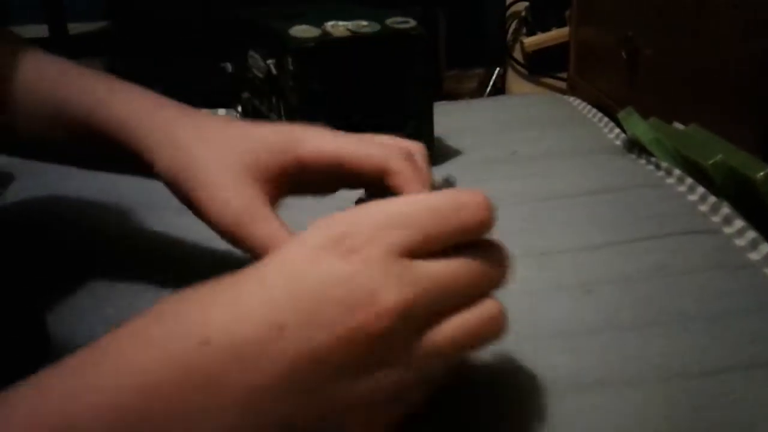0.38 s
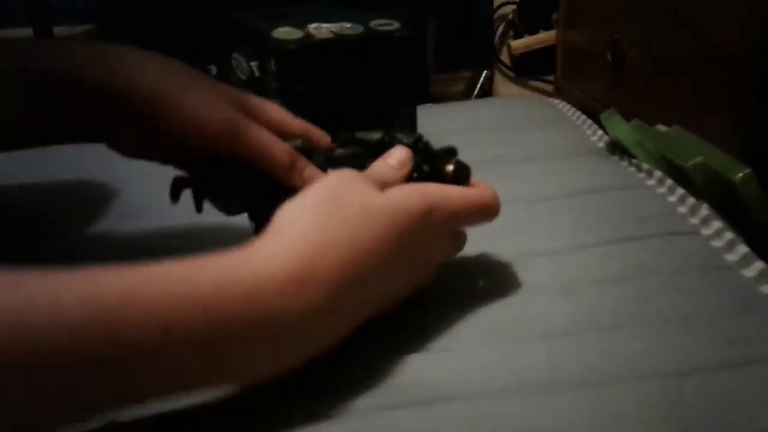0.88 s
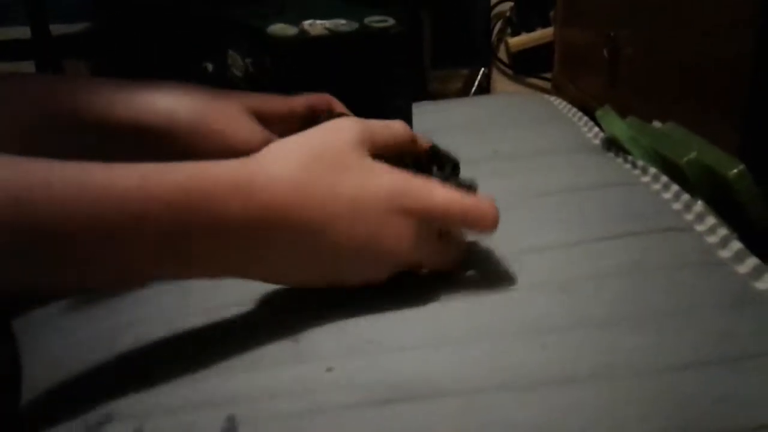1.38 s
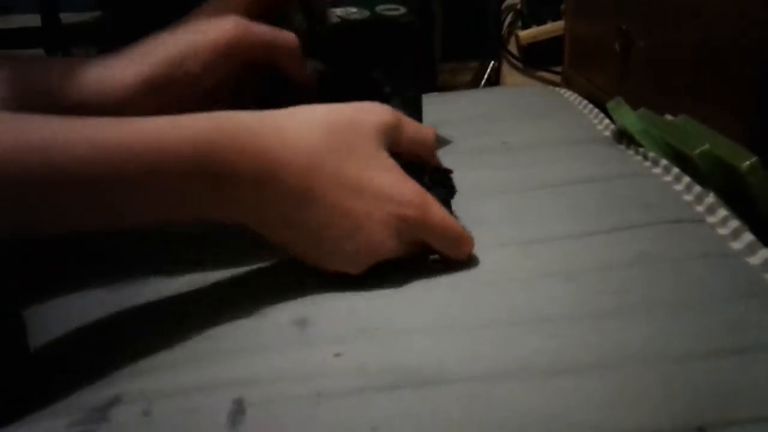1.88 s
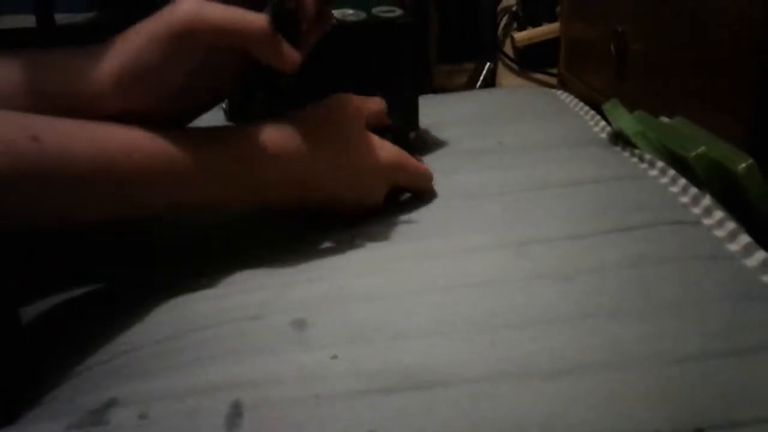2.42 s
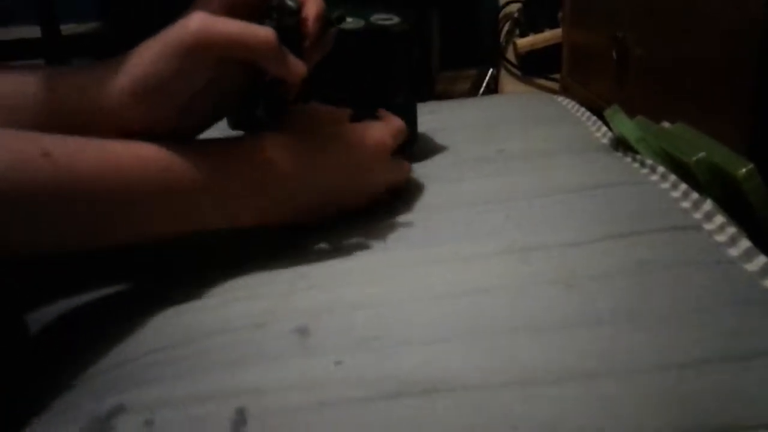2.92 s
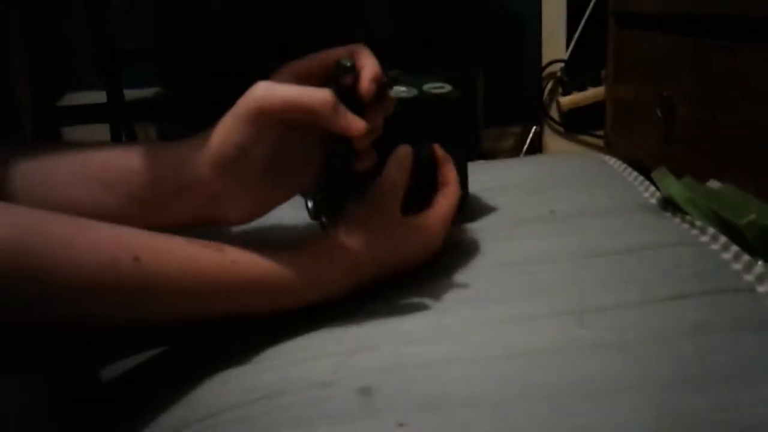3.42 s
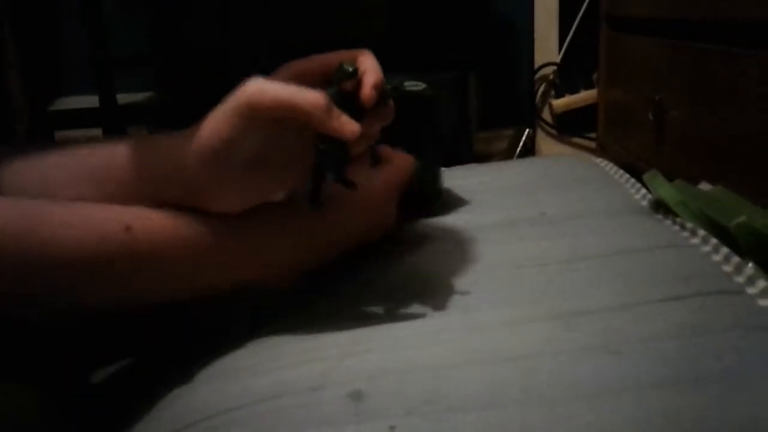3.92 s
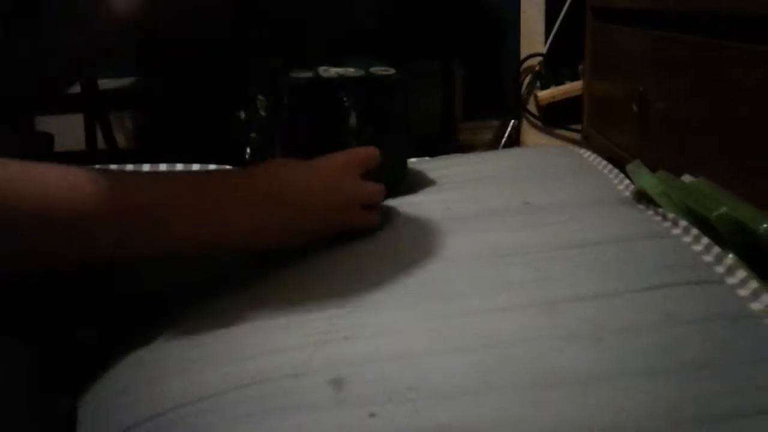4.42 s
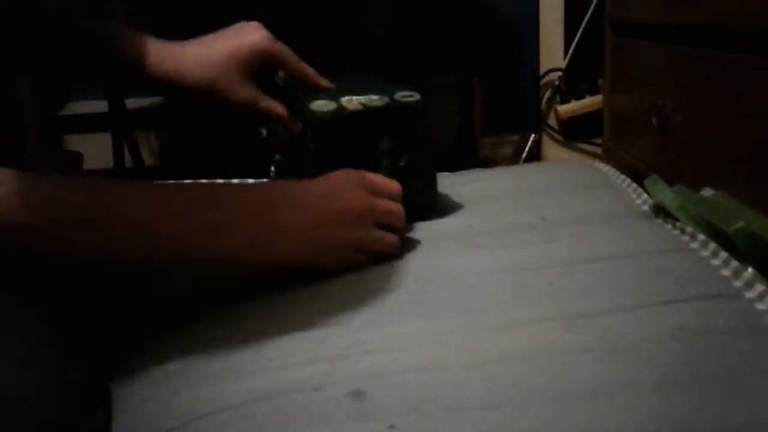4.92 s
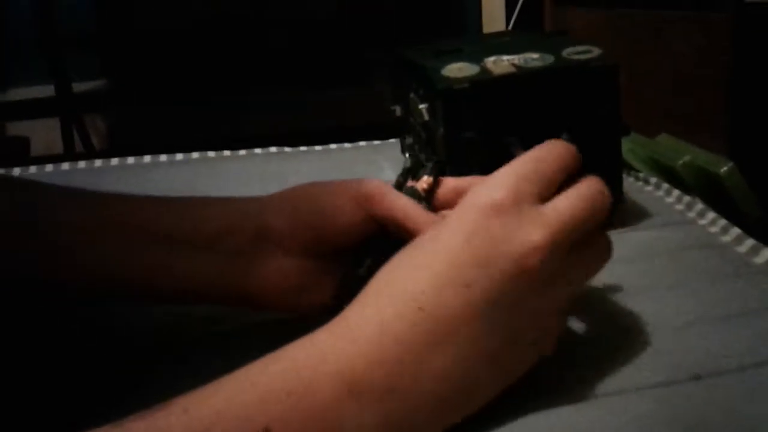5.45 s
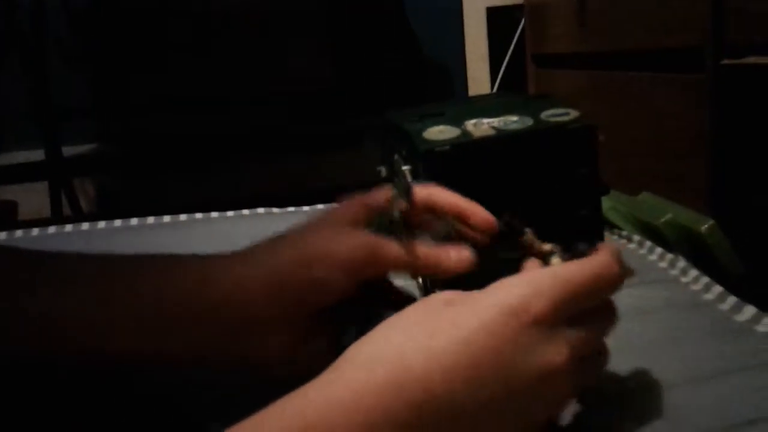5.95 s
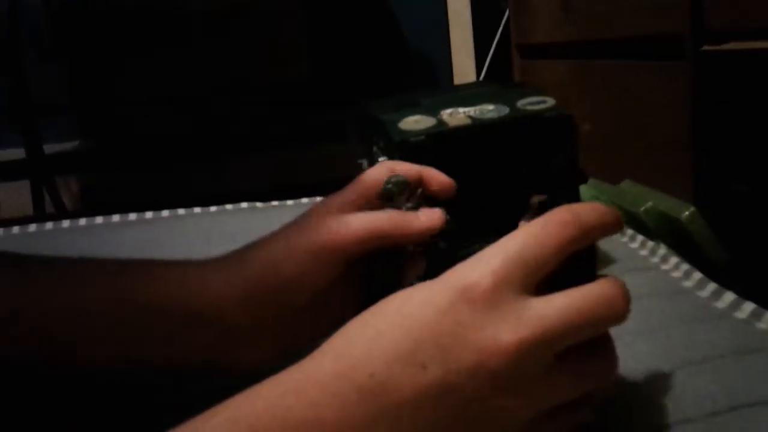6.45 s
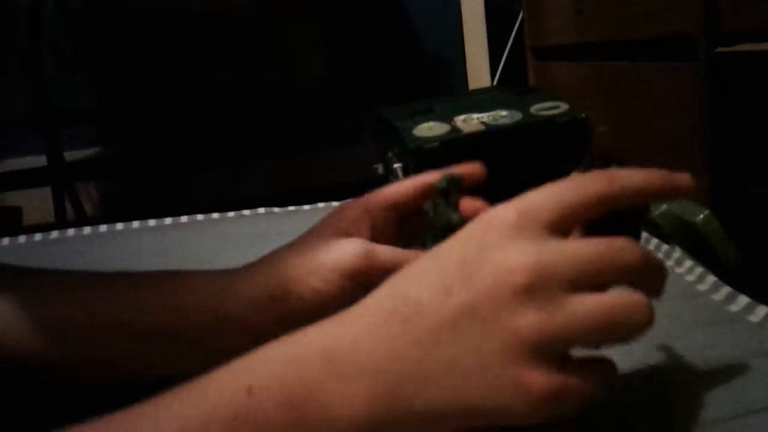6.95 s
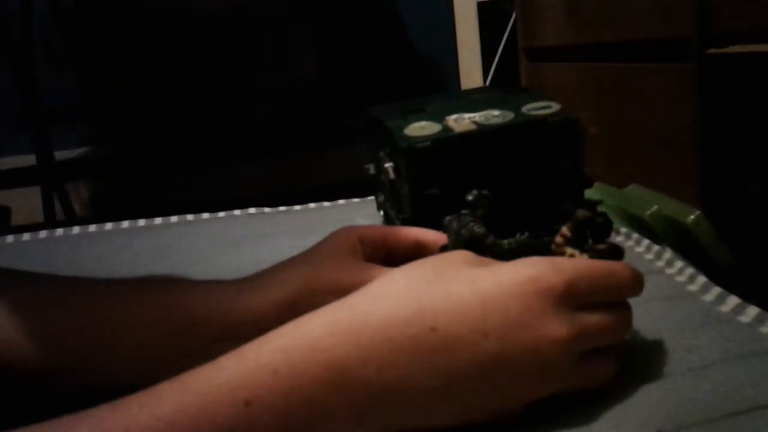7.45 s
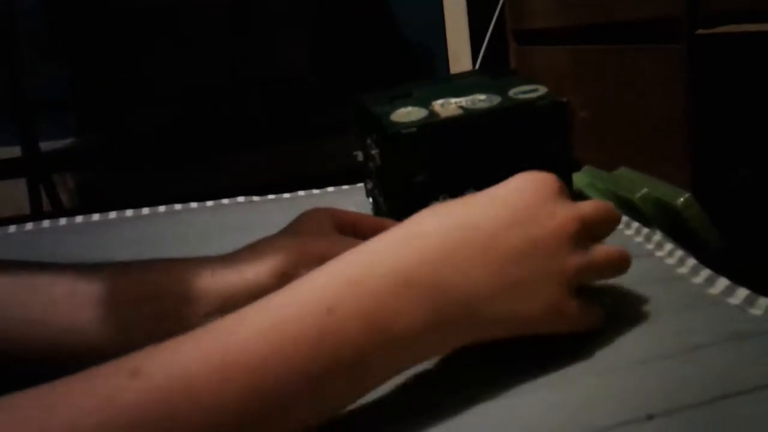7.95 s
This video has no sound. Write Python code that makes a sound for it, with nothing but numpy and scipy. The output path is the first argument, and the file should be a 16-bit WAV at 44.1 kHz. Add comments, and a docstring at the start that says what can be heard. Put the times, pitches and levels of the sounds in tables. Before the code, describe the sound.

Close, bright plastic clicking and cloth rubbing, growing into dense hollow toy knocks, then an abrupt cut to camera bumps and a nearly quiet room.

```python
"""A quiet room, a small mono microphone with a strong treble resonance close to a cloth-covered table.
First hands shuffle small plastic figures: noisy contacts click, skin and cloth rub as shaped noise; then
figures knock on a hollow toy truck, whose shell and body ring in decaying modes. At a cut to a second shot
the camera is nudged (low swings and dry ticks), soft brushes follow and a few last knocks end it. Under
all lies a rumble of filtered noise; a thin sine whines and narrow noise squeaks in the first shot."""
import sys
import numpy as np
from scipy import signal
from scipy.fft import rfft, irfft
from scipy.io import wavfile
from scipy.ndimage import uniform_filter1d

SR = 44100
rng = np.random.default_rng(int(sys.argv[2]) if len(sys.argv) > 2 else 0)


def master_out(mix):
    """Clip the mix to full scale and print it as 16-bit PCM to the path in sys.argv[1]."""
    frames = np.transpose(np.atleast_2d(mix))
    ceiling = np.clip(frames, -1, 1)
    pcm = np.round(ceiling * 32767).astype(np.int16)
    wavfile.write(sys.argv[1], SR, pcm)


def volts_from_decibels(level):
    """Turn decibel levels (scalar or array-like) into linear amplitude factors."""
    exponent = np.asarray(level, float) / 20
    return 10 ** exponent


N = 356757
CUT_S = 5.082  # the second shot starts here

# Low noise of the house in the room. Each row: frequency in Hz, relative level in dB.
RUMBLE_SPECTRUM = [(18, -55.5), (30, -26), (63, -4), (80, 2.5), (102, -2.5), (113, -5.5), (134, -1),
                   (181, -1), (255, -9), (344, -5), (445, -26.5), (1830, -21.5), (5000, -64), (6500, -79),
                   (11000, -120)]
# Low modes of the room. Each row: frequency in Hz, width in Hz, relative level in dB.
ROOM_MODES = [(94, 14, -1.5), (145, 14, -0.5), (191, 18, -4.5), (406, 8.7, -6.5)]
# Loudness of the rumble. Each row: time in seconds, level in dB.
RUMBLE_LEVEL = [(0, -56), (.2, -63.5), (.59, -56.5), (.9, -61), (2.5, -61), (2.75, -53.5), (3.13, -59.5),
                (4.05, -55), (4.89, -55.5), (5.2, -62), (6.3, -61.5), (6.6, -65), (7.44, -62.5),
                (8.09, -57)]
# Dying away of the room. Each row: frequency in Hz, t60 in seconds.
ROOM_DECAY = [(250, .15), (1000, 0.11), (3000, 0.19), (7000, 0.094), (12000, .12)]
# Treble response of the microphone port. Each row: frequency in Hz, relative level in dB.
PORT_RESPONSE = [(300, -52), (3000, -27.5), (4300, -28.5), (5400, -13), (6200, -3), (7000, -4),
                 (7800, -7.5), (9400, -21), (12000, -47.5), (16000, -79)]
# Knocks carried through the camera body. Each row: start in seconds, thud peak in dB, tick level in dB.
CAMERA_NUDGES = [(5.1539, -37, -45), (5.1617, -44, -27), (5.168, -42.5, -40), (5.2812, -39.5, -63.5),
                 (5.2882, -57, -30), (5.2912, -46.5, -41), (5.2987, -38, -45.5), (5.3095, -40, -39),
                 (5.315, -27, -45), (5.3215, -43, -46.5), (5.328, -29.5, -37), (5.342, -41, -53),
                 (5.3728, -53, -44), (5.4032, -48, -39), (5.5873, -57, -50), (5.6178, -60, -47),
                 (5.6647, -50, -42.5), (5.6797, -38.5, -56), (5.7085, -38, -35.5), (5.7205, -39.5, -50),
                 (5.7253, -29.5, -67.5), (5.7305, -20.5, -20.5)]
# Faint squeaks of plastic under a finger. Each row: start in seconds, length in seconds, level in dB,
# frequency in Hz.
FINGER_SQUEAKS = [(-.03, .08, -58, 1740), (1.098, 0.15, -66.5, 1680), (1.5, 0.058, -68.5, 1700),
                  (1.864, .08, -68, 1950), (3.1, .1, -70, 1770)]
# Short soft brushes, a hand on cloth perhaps. Each row: time of the peak in seconds, hiss peak in dB,
# fade in dB per second.
SOFT_BRUSHES = [(5.75, -71, 68), (6.2, -65.5, 149.5), (7.03, -72, 68), (7.63, -75.5, 100)]
# Rubbing of skin, cloth and plastic, one table per shot. Each row: time in seconds, hiss level in dB,
# level of the lower rustle in dB, share of grit from 0 to 1.
RUBBING = [
    [(0, -53.5, -58, .5), (.07, -70, -71.5, 0.7), (.16, -58, -64.5, 0.4), (.25, -71.5, -76.5, 0.8),
     (.4, -71, -74, 0.5), (.6, -51.5, -63.5, .4), (.76, -59, -70, 0.56), (.86, -75, -75, 0.3),
     (.95, -61, -70.5, 0.5), (1.17, -66, -67.5, 0.55), (1.25, -75, -76, .3), (1.5, -72, -71.5, 0.74),
     (1.82, -78.5, -78, .3), (1.95, -64, -66.5, .6), (2.05, -73, -78, 0.5), (2.2, -62.5, -67, .3),
     (2.47, -84, -81, .2), (2.72, -42.5, -48.5, .5), (2.8, -58, -59, 0.44), (2.89, -51, -55.5, 0.4),
     (3.03, -71, -71.5, 0.9), (3.11, -63, -66.5, 0.25), (3.19, -68, -71, 0), (3.43, -52, -63, 0.04),
     (3.55, -59.5, -63, 0.06), (3.85, -57.5, -68, .05), (4.05, -46.5, -49.5, 0.6), (4.13, -53.5, -50, 0.3),
     (4.24, -45, -45.5, 0.24), (4.44, -46.5, -54.5, 0.43), (4.67, -53, -65, 0.25), (4.83, -55, -63, 0.26),
     (4.98, -44.5, -48.5, .4), (5.06, -49.5, -60, 0.3)],
    [(5.09, -102, -77.5, 0.24), (5.27, -97, -73, 0.45), (5.3, -90, -52, .8), (5.34, -92, -55, 0.7),
     (5.38, -106, -75.5, 0.3), (5.71, -98, -68, 0), (5.75, -85.5, -73.5, 0.18), (6.6, -85, -78, 0.4),
     (7.1, -83, -73.5, .2), (7.55, -91.5, -81.5, 0.22), (7.84, -86, -75.5, 0.18), (7.92, -79, -67.5, 0.3),
     (8.04, -78.5, -72, 0.14), (8.08, -86, -49, 0.4)],
]
# Wandering band of the smooth friction, one table per shot. Each row: time in seconds, centre in Hz,
# strength of the band as a factor.
FRICTION_BAND = [
    [(3.0, 6600, 2), (3.35, 6800, 3), (3.45, 7200, 7), (3.85, 7200, 7), (4.1, 7100, 4), (4.45, 7300, 4),
     (4.8, 6900, 3), (5.05, 6700, 2)],
    [(5.72, 7000, 2), (5.8, 7200, 2), (6.2, 6500, 2), (7.1, 6600, 2), (7.7, 6800, 2)],
]
# Thin shell of the toys. Each row: frequency in Hz, relative level in dB, t60 in seconds.
SHELL_MODES = [(1173, -3.5, 0.021), (1330, -4, 0.027), (1522, -3.5, 0.02), (1770, -4, 0.02),
               (2050, 0, 0.017), (2214, -5.5, 0.029), (2390, -7.5, 0.027), (2696, -5.5, 0.018),
               (2975, -8, .015), (3420, -11, .012), (3940, -16.5, 0.006), (4260, -15, 0.0071)]
# Hollow body of the toys. Each row: frequency in Hz, relative level in dB, t60 in seconds.
HOLLOW_MODES = [(220.6, -7, 0.051), (278, 2, 0.026), (342, 1, .045), (423.2, 1, 0.032), (560, -13, 0.09),
                (646, -3, .035), (769, -3, 0.041), (886, -6, .03)]
# Part of the toys being struck, by the note it brings out. Each row: from when in seconds, note in Hz.
STRUCK_PARTS = [(0, 1550), (.44, 2350), (.69, 1620), (1.85, 2000), (1.98, 1710), (2.19, 2050), (2.3, 1515),
                (2.63, 2260), (2.7, 1900), (2.77, 1410), (2.9, 2050), (3.0, 1770), (3.24, 2050),
                (3.5, 1370), (4.0, 2050), (4.19, 1610), (4.34, 1850), (4.84, 2010), (7.8, 2050),
                (7.98, 2300)]
# Figure against figure, light and bright. Each row: start in seconds, click peak in dB,
# chatter t60 in seconds.
FIGURE_TICKS = [(.0795, -46, .009), (.0885, -33, 0.0084), (.1205, -39, 0.05), (.1467, -36.5, 0.014),
                (.1617, -37, 0.0093), (.1905, -50, .009), (.3974, -53, 0.0056), (.406, -34, 0.011),
                (.4652, -16, .0037), (.4767, -17, 0.011), (.482, -20, 0.0048), (.5038, -29, 0.007),
                (.5451, -29, .006), (.5544, -19, 0.0051), (.5599, -17.5, 0.0092), (.5651, -16, .0074),
                (.5826, -10.5, 0.013), (.5939, -16.5, 0.0053), (.598, -26, 0.015), (.6598, -10.5, 0.006),
                (.6625, -16.5, 0.011), (.6956, -49, .006), (.7227, -44, .006), (.7767, -38.5, 0.031),
                (.7851, -43, .0065), (.8687, -46, 0.017), (.8784, -37.5, 0.0084), (.9373, -33, 0.023),
                (.9612, -34, 0.006), (.9962, -26.5, 0.019), (1.0281, -41, 0.0088), (1.0718, -56, .045),
                (1.1092, -34, 0.0063), (1.1165, -37, 0.0068), (1.1264, -40, .012), (1.1462, -30.5, 0.009),
                (1.1728, -35.5, .0067), (1.293, -49, 0.016), (1.3155, -44, 0.011), (1.3288, -47, 0.0049),
                (1.4187, -43.5, 0.16), (1.5093, -46, .026), (1.5297, -45, 0.023), (1.6393, -54, 0.0076),
                (1.7156, -47.5, 0.017), (1.7344, -40, 0.022), (1.7434, -39, 0.016), (1.7573, -30.5, 0.015),
                (1.8735, -43, .006), (1.8861, -33.5, 0.022), (1.9034, -33, 0.0083), (1.9062, -25.5, 0.015),
                (1.9117, -32, 0.0094), (1.9249, -36, .015), (1.94, -43, 0.031), (1.9914, -39.5, 0.038),
                (2.1248, -48, 0.049), (2.1375, -41, 0.023), (2.1477, -38, 0.0055), (2.1579, -34, 0.021),
                (2.1654, -35, .04), (3.1422, -43, .0055), (3.1533, -42, 0.01), (4.3737, -34, 0.015),
                (5.0783, -32.5, .0078), (7.7902, -41.5, .0073)]
# Figure against the truck. Each row: start in seconds, click peak in dB, chatter t60 in seconds,
# shell level in dB, hollow peak in dB.
TRUCK_KNOCKS = [(2.2013, -18.5, .018, -33, -40), (2.2307, -35.5, .03, -40.5, -47.5),
                (2.3443, -40.5, .042, -41.5, -54), (2.5085, -37.5, .042, -41.5, -41.5),
                (2.5541, -37, .023, -54.5, -43.5), (2.5806, -29.5, .01, -45, -40),
                (2.6009, -19, .041, -32, -36), (2.6482, -17, .064, -21.5, -42),
                (2.654, -17.5, .018, -27, -39.5), (2.66, -14.5, .027, -24, -24.5),
                (2.6683, -12.5, .0028, -32.5, -52.5), (2.7286, -10.5, .015, -28, -33),
                (2.791, -38, .011, -38.5, -41), (2.8391, -32, .0096, -43, -36),
                (2.8656, -32, .011, -45, -40), (2.8827, -29.5, .031, -36.5, -35.5),
                (2.9112, -22.5, .012, -34, -41), (2.9243, -29, .018, -33.5, -36),
                (3.2583, -26.5, .057, -40, -30), (3.3786, -43, .014, -54, -45),
                (3.4028, -17, .028, -24.5, -32.5), (3.4188, -33, .011, -45, -34.5),
                (3.4227, -26, .007, -30.5, -58), (3.4344, -30, .01, -54, -61),
                (3.5326, -28.5, .04, -34.5, -38.5), (3.8299, -32.5, .033, -43, -47),
                (3.853, -33, .058, -47, -38), (3.8834, -27.5, .044, -45.5, -39),
                (3.902, -25.5, .035, -39, -63), (3.9691, -23.5, .029, -29, -42),
                (3.9793, -37, .0095, -30, -32.5), (4.0105, -18, .024, -35, -37.5),
                (4.033, -30, .036, -38.5, -39.5), (4.0641, -36, .039, -51.5, -53),
                (4.0848, -25, .009, -44, -31.5), (4.1099, -27, .017, -42.5, -46),
                (4.1155, -19, .013, -39.5, -43.5), (4.1529, -26, .019, -40.5, -44.5),
                (4.1597, -25, .0086, -37.5, -41.5), (4.1717, -10, .032, -22.5, -27),
                (4.2053, -5.5, .035, -31.5, -26), (4.209, -9, .031, -29.5, -38),
                (4.2646, -9.5, .034, -22, -33.5), (4.2909, -12, .014, -36, -37.5),
                (4.357, -27, .022, -33.5, -36.5), (4.4903, -32.5, .25, -39.5, -46),
                (4.505, -23, .05, -39.5, -35), (4.7817, -37.5, .04, -49.5, -50),
                (4.8666, -23, .028, -46, -41), (4.9005, -24, .021, -37.5, -37),
                (4.9152, -13.5, .034, -36, -42.5), (5.0005, -30.5, .03, -41.5, -43.5),
                (5.0679, -26, .0082, -46, -46), (7.851, -47, .028, -39.5, -50),
                (7.9472, -62, .041, -46.5, -45), (7.9972, -48, .015, -33, -50),
                (8.0574, -37.5, .032, -28, -39.5), (8.0759, -28.5, .004, -51.5, -54)]

WHINE_HZ, WHINE_DB = 1550, -85.5
SQUEAK_WIDTH_HZ = 36
BRUSH_RISE_S = 0.029
SCRAPE_DB = -6  # level of the shell's rustle against the hollow body's rustle
TICK_SHELL_DB, TICK_HOLLOW_DB = -58, -65.5  # ring of a tick of -35 dB
TICK_RING_SLOPE = 0.36  # dB of ring per dB of click
# stray small ticks, over the gritty share of the hiss
FIDGET_DB, FIDGET_SPREAD_DB, FIDGET_T60_S = 19.5, 3.5, 0.0081
# lift of the favoured note; in the second shot the truck's side faces the microphone
FAVOUR_FIRST_DB, FAVOUR_SECOND_DB = 8, 15


def evened(x):
    """Scales to rms 1."""
    return x / np.sqrt(np.mean(x ** 2) + 1e-20)


def peaked(x):
    """Scales each row to peak 1."""
    return x / abs(x).max(-1, keepdims=True)


def read(points, hz):
    """Reads a spectrum on a log-frequency axis."""
    f, value = np.transpose(points)
    return np.interp(np.log(hz + 1), np.log(f + 1), value)


def curve(tables, column):
    """One column of time tables at every sample; a second table takes over at the cut."""
    t = np.arange(N) / SR
    first, second = (np.interp(t, *np.transpose(rows)[[0, column]]) for rows in (tables[0], tables[-1]))
    return np.where(t < CUT_S, first, second)


def causal(points, size=2048):
    """Minimum-phase response of a spectrum."""
    log_gain = np.log(volts_from_decibels(read(points, abs(np.fft.fftfreq(2 * size, 1 / SR)))))
    return np.fft.ifft(np.exp(np.conj(signal.hilbert(log_gain)))).real[:size]


def resonate(x, hz, width_hz):
    """A moving resonance: shifts the curve hz down to zero, smooths, and shifts back."""
    turn = np.exp(2j * np.pi * np.cumsum(hz) / SR)
    r = np.exp(-np.pi * width_hz / SR)
    return 2 * (turn * signal.lfilter([1 - r], [1, -r], x / turn)).real


def placed(seconds, sounds):
    """Mixes rows of sound at their times."""
    mix = np.zeros(N + sounds.shape[1])
    for s, sound in zip(seconds, sounds):
        mix[round(s * SR):][:len(sound)] += sound
    return mix[:N]


def rumble():
    """Distant house noise, gathered in the low modes of the room."""
    hz = np.fft.rfftfreq(N, 1 / SR)
    shape = volts_from_decibels(read(RUMBLE_SPECTRUM, hz))
    for mode_hz, width, db in ROOM_MODES:
        shape = shape + volts_from_decibels(db) / (1 + (2 * (hz - mode_hz) / width) ** 2)
    noise = irfft(rfft(rng.standard_normal(N)) * shape, N)
    return volts_from_decibels(curve([RUMBLE_LEVEL], 1)) * evened(noise)


def whine():
    """A faint thin tone in the first shot that wavers in strength."""
    t = np.arange(N) / SR
    waver = 1 + 0.48 * evened(uniform_filter1d(rng.standard_normal(N), 4000))
    return volts_from_decibels(WHINE_DB) * waver * np.sin(2 * np.pi * WHINE_HZ * t) * (t < CUT_S)


def room(x, count=4):
    """Sparse random taps, each band dying at its own speed, in echo patterns that crossfade in turn."""
    taps = np.zeros((count, SR // 2))
    at = np.arange(60, SR // 2 - 20, 20)
    at = at + rng.integers(0, 20, (count, len(at)))
    np.put_along_axis(taps, at, rng.choice([-1., 1.], at.shape), 1)
    hz, t, z = signal.stft(taps, SR, nperseg=256)
    t60 = np.maximum(read(ROOM_DECAY, hz), .02)[:, None]
    tails = signal.istft(z * volts_from_decibels(-60 * t / t60), SR, nperseg=256)[1]
    # 11 changes a second, so that no single echo colour stands out
    turn = (np.arange(N) * 11 / SR - np.arange(count)[:, None]) % count
    windows = np.sin(np.pi * np.minimum(turn, 2) / 2)  # squares sum to 1
    return signal.oaconvolve(x * windows, tails / np.linalg.norm(tails[0]), axes=1).sum(0)[:N]


def nudges():
    """A low swing of the camera body that soon dies away, with a dry tick at its start."""
    s, thud_db, tick_db = np.transpose(CAMERA_NUDGES)[:, :, None]
    t = np.arange(2048) / SR
    hz = 125 * (1 + 0.14 * rng.standard_normal((len(s), 1)))
    thud = -np.sin(2 * np.pi * hz * t * (1 + 2.2 * np.exp(-t / 0.0027))) * np.exp(-170 * t)
    tick = np.exp(-abs(t - .0006) / .00025) * np.cos(2 * np.pi * 800 * (t - .0006))
    tick = uniform_filter1d(tick, size=7)
    return placed(s[:, 0], volts_from_decibels(thud_db) * peaked(thud) + volts_from_decibels(tick_db) * tick)


def squeaks():
    """Noise in a narrow resonance that swells and dies."""
    t, out = np.arange(N) / SR, np.zeros(N)
    noise = rng.standard_normal(N)
    for s, length, db, hz in FINGER_SQUEAKS:
        part = slice(max(round(s * SR), 0), round((s + length) * SR))
        tone = resonate(noise[part], np.full(len(t[part]), hz), SQUEAK_WIDTH_HZ)
        swell = np.sin(np.pi * np.clip((t[part] - s) / length, 0, 1))
        out[part] += volts_from_decibels(db) * evened(tone) * swell
    return out


def brushes():
    """Gain of the brushing hiss: a quick rise, then a steady fade."""
    s, peak_db, fade = np.transpose(SOFT_BRUSHES)[:, :, None]
    t = np.arange(N) / SR - s
    rise = np.clip(1 + t / BRUSH_RISE_S, 0, 1)
    return (volts_from_decibels(peak_db - fade * np.maximum(t, 0)) * rise).sum(0)


def ringing(modes, note_hz=np.ones((1, 1)), spread=0.01523, favour_db=np.zeros((1, 1))):
    """Rows of decaying modes; each blow lands elsewhere and favours the modes near its note."""
    t = np.arange(4096) / SR
    chance = rng.standard_normal((len(note_hz), len(modes), 2))
    hz, db, t60 = np.transpose(modes)[:, None, :, None]
    near = np.log(hz / note_hz[:, None])
    # a high note on the shell comes with one of the hollow
    below = np.exp(-((near + np.log(2.8)) / .15) ** 2)
    db = db + favour_db[:, None] * np.exp(-(near / .14) ** 2) + 5 * below + 2.5 * chance[..., 1:]
    hz = hz * (1 + spread * chance[..., :1])
    sign = (-1.) ** np.arange(len(modes))[:, None]  # neighbouring modes swing against each other
    ring = (sign * volts_from_decibels(db - 60 * t / t60) * np.sin(2 * np.pi * hz * t)).sum(1)
    # small bodies send out no bass
    no_bass = signal.butter(3, 0.84 * modes[0][0], "high", fs=SR, output="sos")
    return signal.sosfilt(no_bass, ring)


def rubbing():
    """Smooth friction plus grit of tiny slips drives the microphone port, the shell and the hollow body."""
    slip_size = volts_from_decibels(3.5 * np.minimum(rng.exponential(1, N), 4))
    slip_now = rng.random(N) < 700 / SR  # about 700 slips a second
    grit = slip_size * slip_now * rng.choice([-1., 1.], N)
    share = np.clip(curve(RUBBING, 3), 0, 1)
    smooth = rng.standard_normal((3, N))
    smooth[0] += curve(FRICTION_BAND, 2) * resonate(smooth[0], curve(FRICTION_BAND, 1), 500)
    damped = volts_from_decibels(-60 * np.arange(4096) / SR / 0.0045)  # fingers damp the toys
    shell = ringing(SHELL_MODES, spread=0)[0] * damped
    hollow = ringing(HOLLOW_MODES, spread=0)[0] * damped
    lower = volts_from_decibels(curve(RUBBING, 2))
    gains = [volts_from_decibels(curve(RUBBING, 1)) + brushes(), volts_from_decibels(SCRAPE_DB) * lower, lower]
    out = np.zeros(N)
    for k, body in enumerate([causal(PORT_RESPONSE), shell, hollow]):
        slide, slips = (evened(signal.oaconvolve(x, body)[:N]) for x in (smooth[k], grit))
        out += gains[k] * (np.sqrt(1 - share) * slide + np.sqrt(share) * slips)
    return out


def blows():
    """All blows as rows of TRUCK_KNOCKS: knocks, ticks and the stray ticks of fidgeting fingers."""
    when, size = rng.random((70, 2)).T
    at = (when * CUT_S * SR).astype(int)
    gritty_db = curve(RUBBING, 1)[at] + 10 * np.log10(np.clip(curve(RUBBING, 3)[at], .01, 1))
    click_db = gritty_db + FIDGET_DB + FIDGET_SPREAD_DB * (2 * size - 1)
    strays = np.transpose([at / SR, click_db, np.full(len(at), FIDGET_T60_S)])
    ticks = np.vstack([FIGURE_TICKS, strays])
    ring_db = TICK_RING_SLOPE * (ticks[:, 1:2] + 35)
    ticks = np.hstack([ticks, ring_db + TICK_SHELL_DB, ring_db + TICK_HOLLOW_DB])
    return np.vstack([TRUCK_KNOCKS, ticks])


def clicks():
    """A hard contact chatters briefly, excites the port resonance and rings shell and hollow body."""
    s, click_db, t60, shell_db, hollow_db = blows().T[:, :, None]
    since, notes = np.transpose(STRUCK_PARTS)
    note_hz = notes[np.maximum(np.searchsorted(since, s) - 1, 0)]
    t, t60 = np.arange(4096) / SR, np.maximum(t60, .002)
    noise = rng.standard_normal((len(s), 4096, 2))
    chatter = noise[..., 0] * volts_from_decibels(-60 * t / t60)
    chatter[:, 0] += 0.059 / t60[:, 0]  # in a clean click the first touch stands alone
    click = signal.fftconvolve(chatter, causal(PORT_RESPONSE)[None], axes=1)[:, :4096]
    # a jolt, then longer shaking
    push = noise[..., 1] * (volts_from_decibels(-60 * t / (1.3 * t60 + 0.053)) + 0.83 * np.exp(-t / 0.00087))
    push[:, 0] += 6.0
    favour_db = np.where(s < CUT_S, FAVOUR_FIRST_DB, FAVOUR_SECOND_DB)
    shell, hollow = (signal.fftconvolve(push, ringing(modes, note_hz, favour_db=favour_db), axes=1)[:, :4096]
                     for modes in (SHELL_MODES, HOLLOW_MODES))
    # the shell cracks broadly before it rings
    crack_band = signal.butter(2, [2000, 5000], "band", fs=SR, output="sos")
    crack = signal.sosfilt(crack_band, push * np.exp(-t / .006))
    shell = peaked(shell) + np.where(s < CUT_S, 0.6, 0.2) * peaked(crack)
    sounds = volts_from_decibels(click_db) * peaked(click) + volts_from_decibels(shell_db) * shell + volts_from_decibels(hollow_db) * peaked(hollow)
    return placed(s[:, 0], sounds)


def scene():
    """Toys, their echoes and the background on two equal channels; the cut chops the toys and echoes."""
    first = np.arange(N) < CUT_S * SR
    toys = clicks() * (first | (np.arange(N) > (CUT_S + .1) * SR))  # no toy clicks for 0.1 s after the cut
    echoes = np.where(first, room(toys * first), room(toys * ~first))
    heard = toys + volts_from_decibels(-7) * echoes + rubbing() + nudges() + rumble() + whine() + squeaks()
    return np.array([heard, heard])


def band_limit(x):
    """A steep low-pass at the top of the band."""
    return signal.sosfilt(signal.butter(12, 16950, fs=SR, output="sos"), x)


def record(dry):
    """The microphone loses the deepest bass; broad recorder hiss rises with the level, up to a ceiling."""
    heard = signal.sosfilt(signal.butter(2, 38, "high", fs=SR, output="sos"), dry)
    power = abs(uniform_filter1d(heard[0] ** 2, 2000))
    level_db = uniform_filter1d(10 * np.log10(power + 1e-12), 3000)
    hiss_db = -77.5 + .5 * (np.minimum(level_db, -50) + 53)
    hiss = volts_from_decibels(hiss_db) * rng.standard_normal(N)
    edge = signal.firwin(255, 15800, fs=SR)  # the treble ends near 15.8 kHz
    mix = signal.oaconvolve(heard + hiss, edge[None], "same")
    return band_limit(mix)


dry = scene()
out = record(dry)
master_out(out)
```